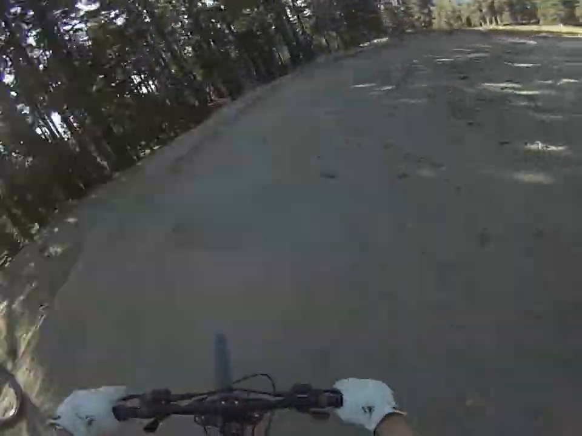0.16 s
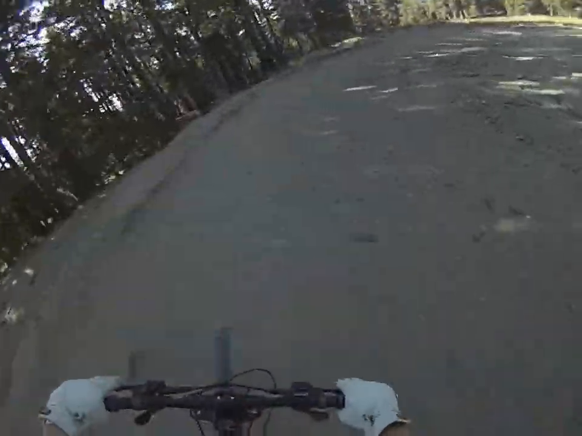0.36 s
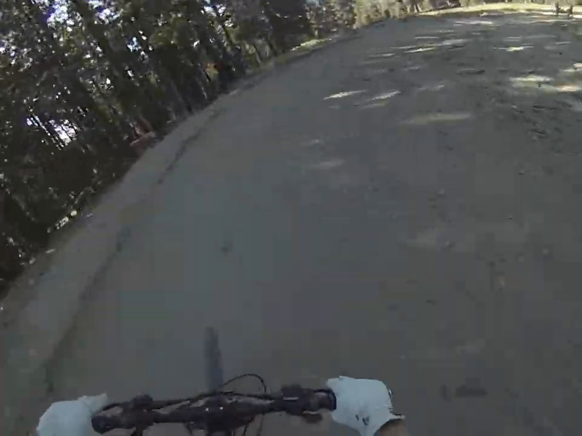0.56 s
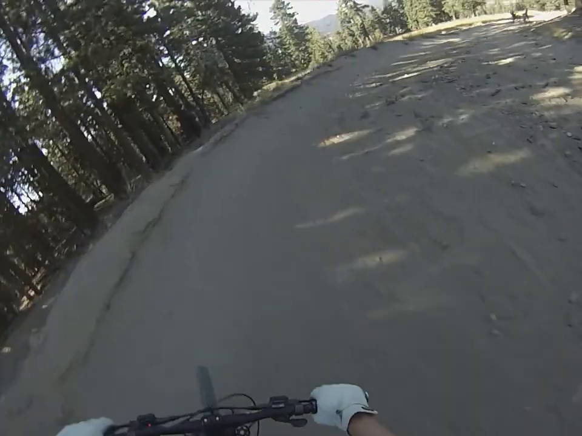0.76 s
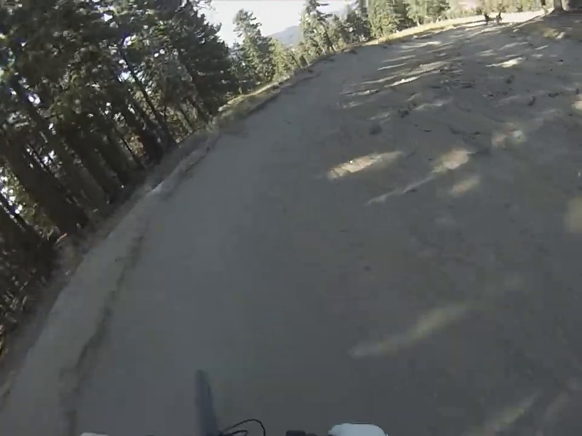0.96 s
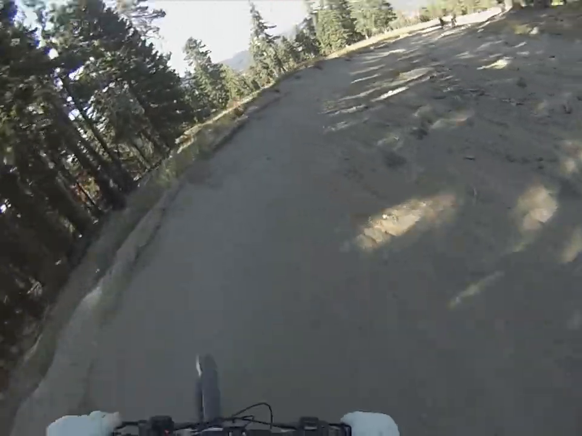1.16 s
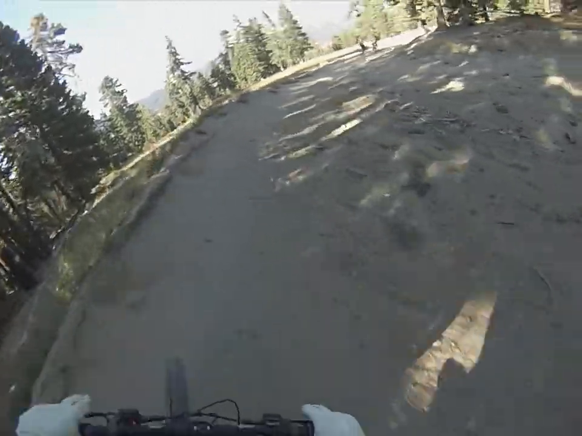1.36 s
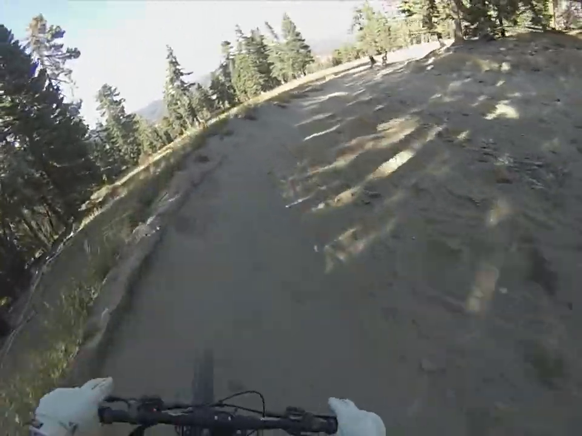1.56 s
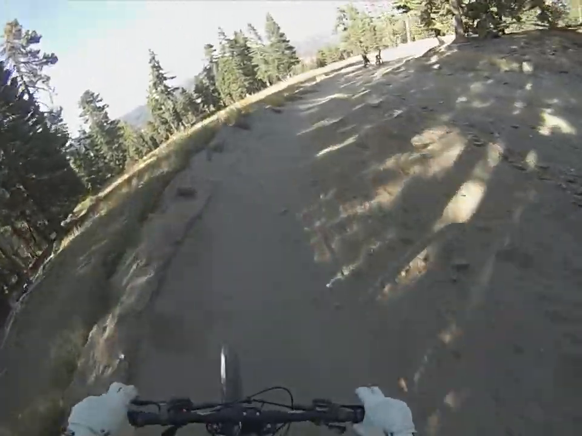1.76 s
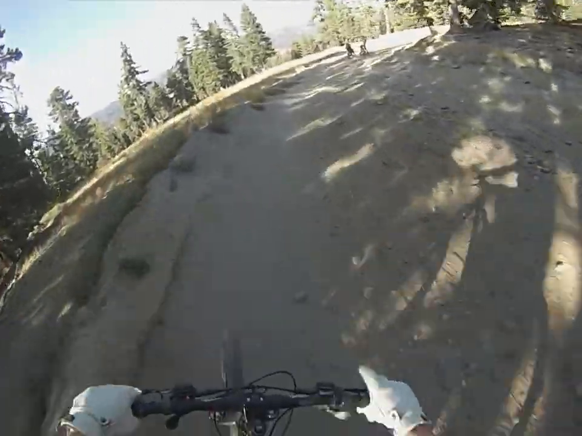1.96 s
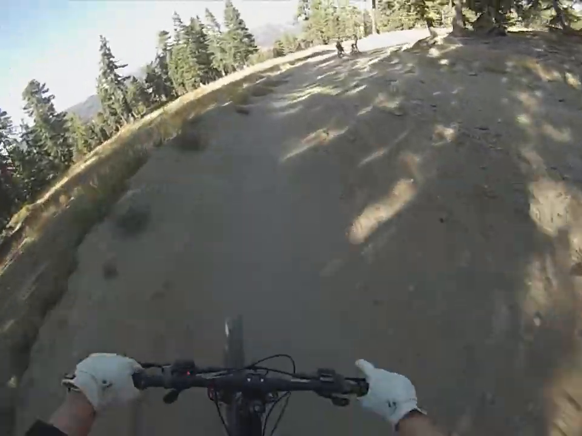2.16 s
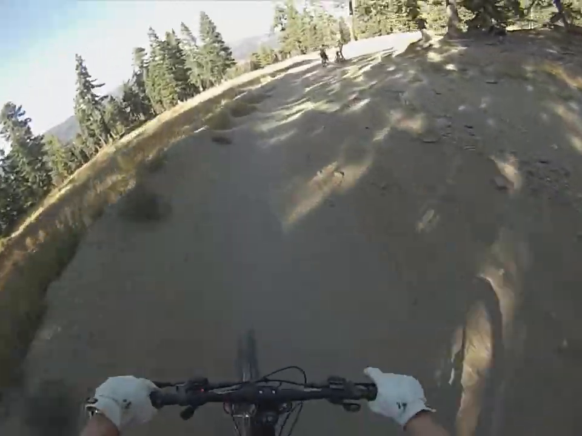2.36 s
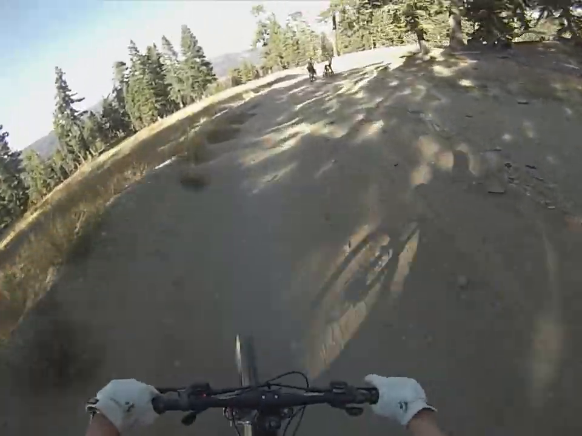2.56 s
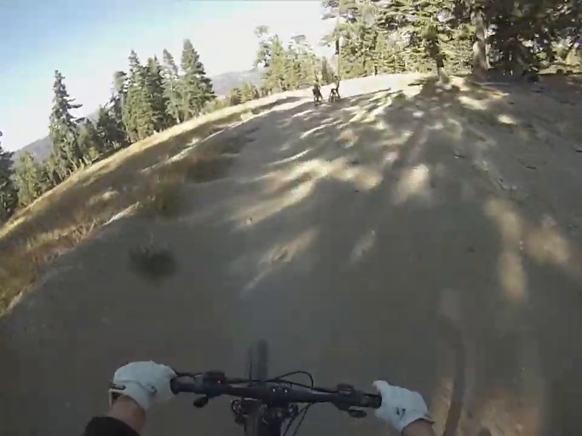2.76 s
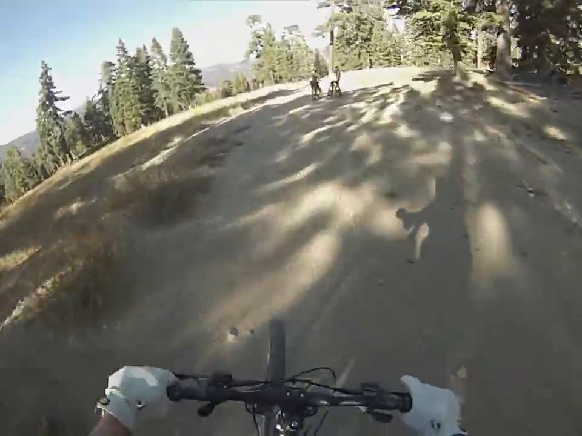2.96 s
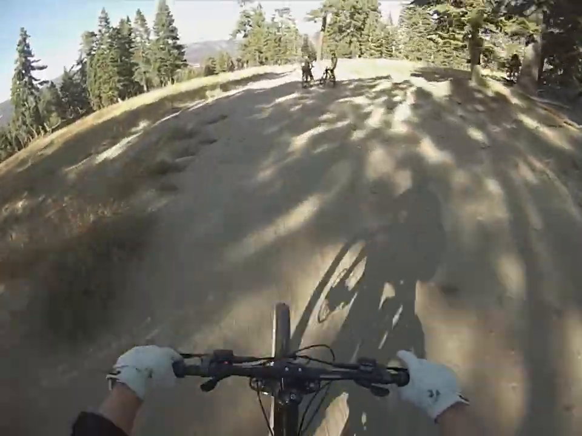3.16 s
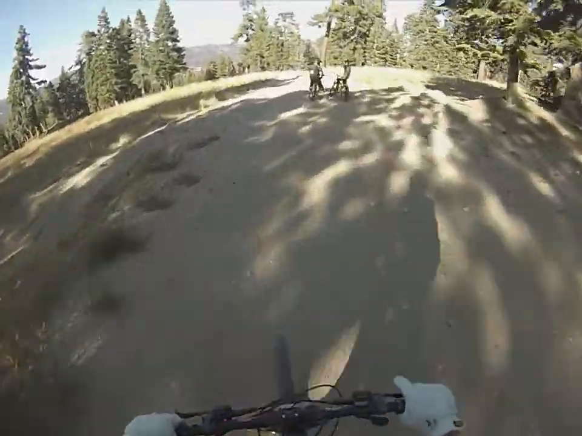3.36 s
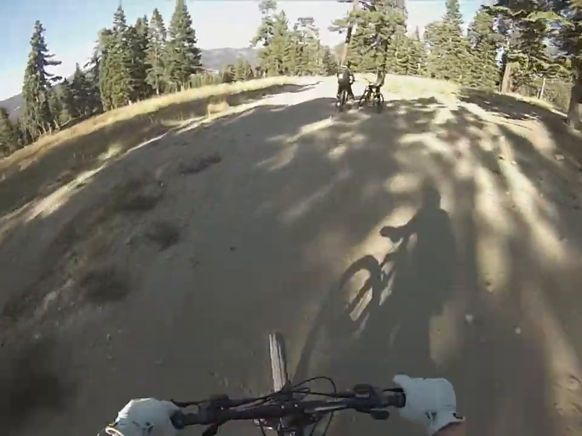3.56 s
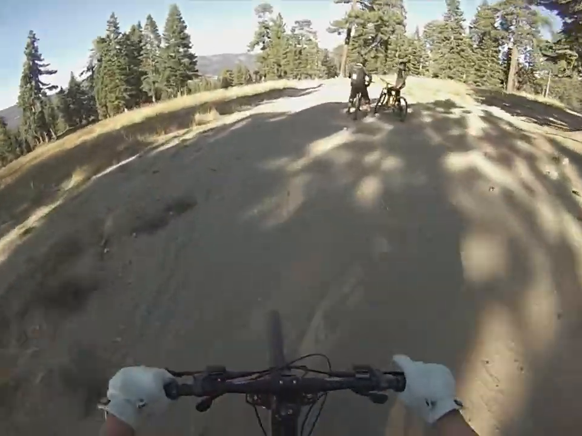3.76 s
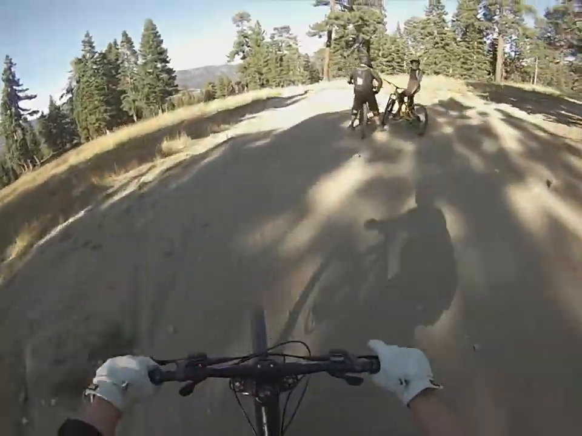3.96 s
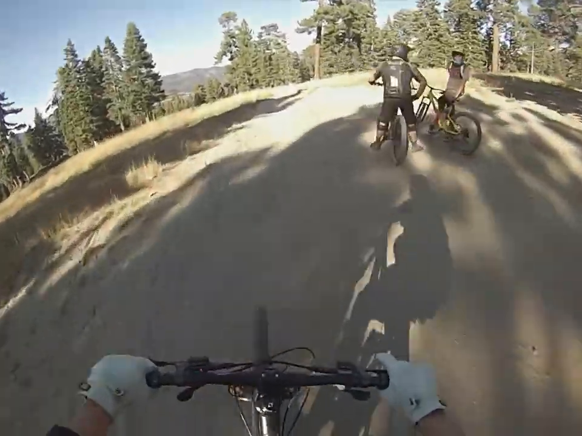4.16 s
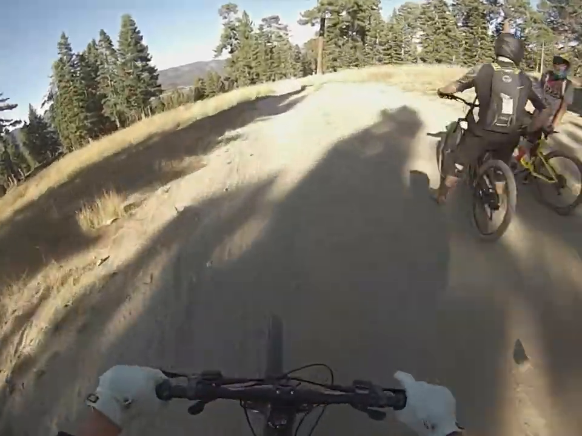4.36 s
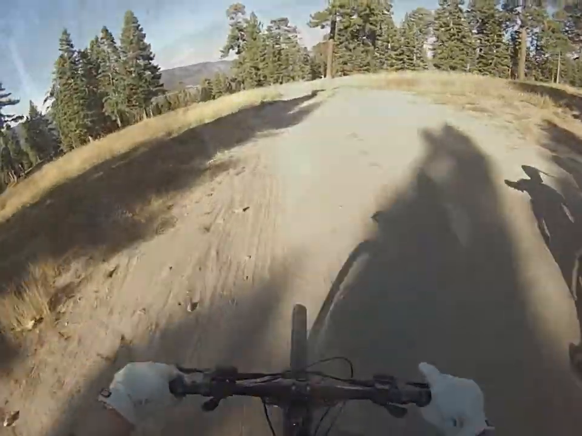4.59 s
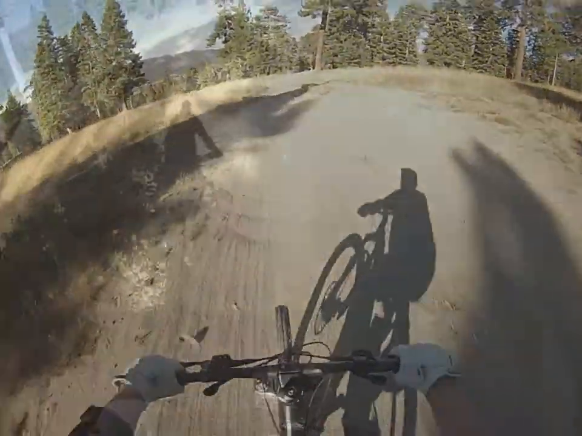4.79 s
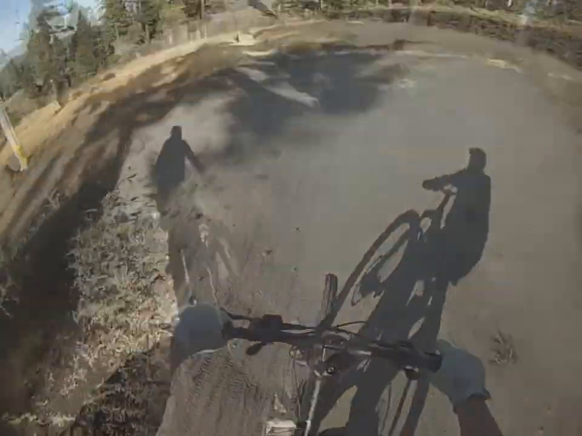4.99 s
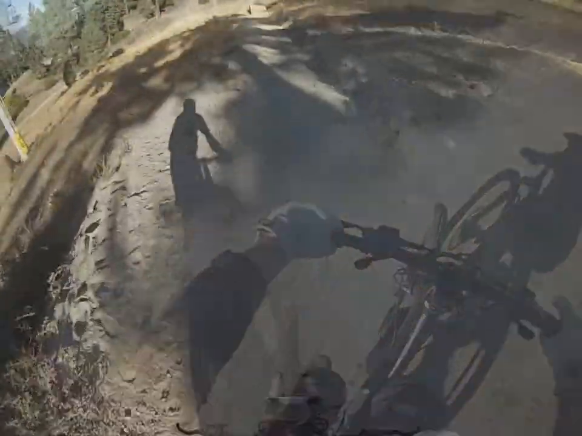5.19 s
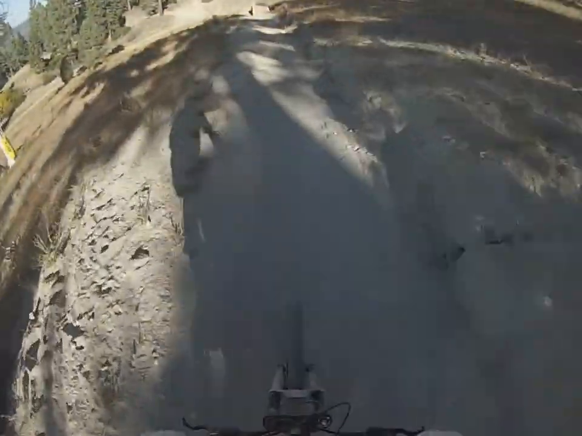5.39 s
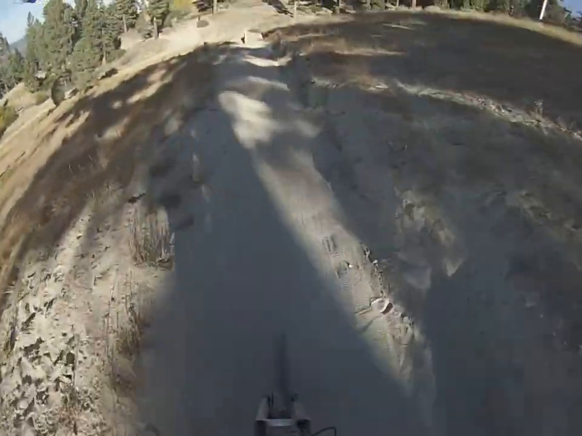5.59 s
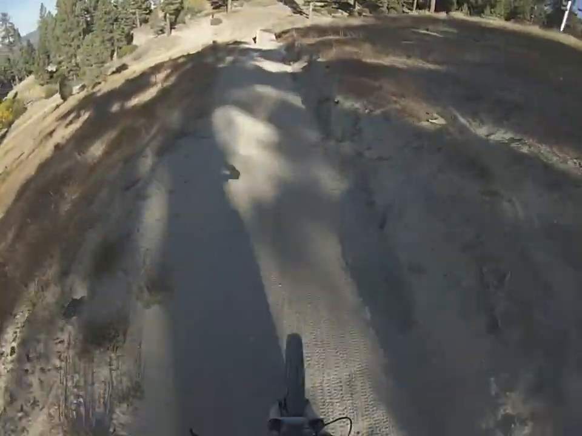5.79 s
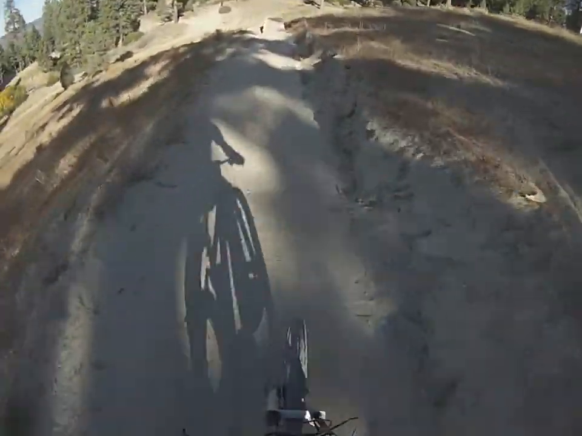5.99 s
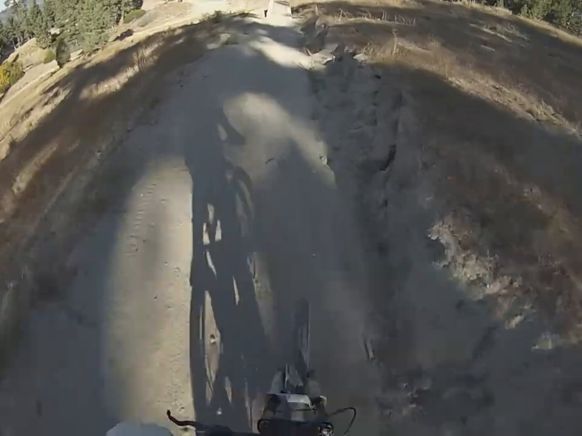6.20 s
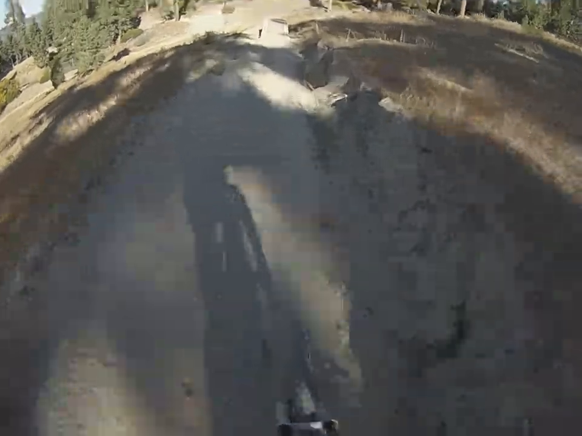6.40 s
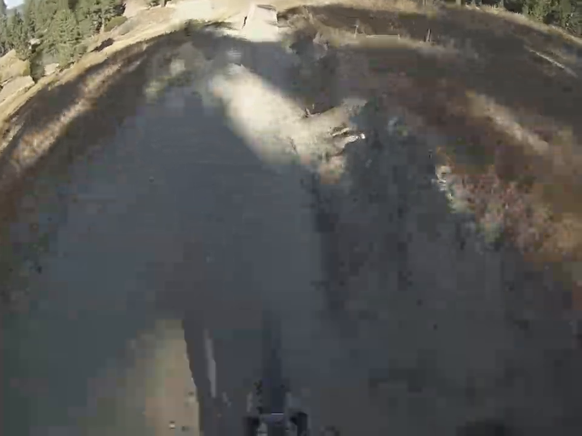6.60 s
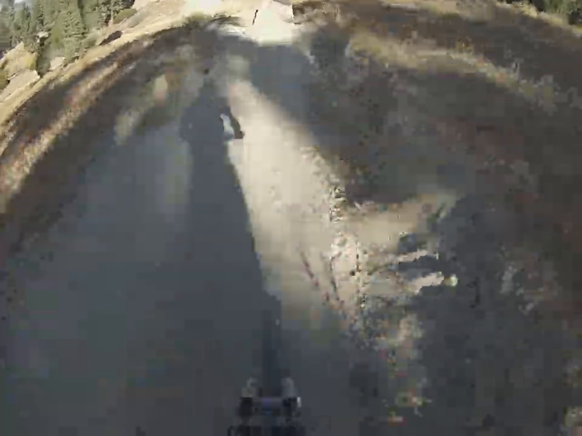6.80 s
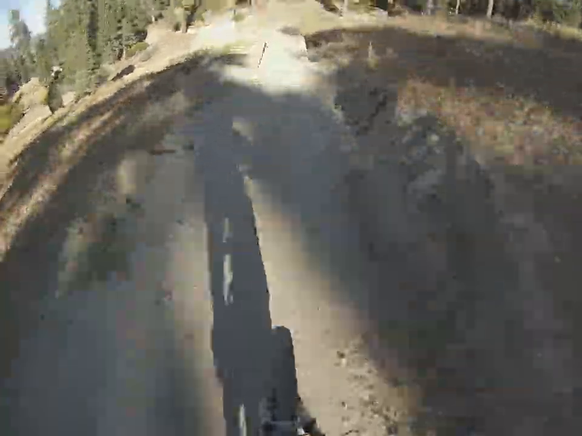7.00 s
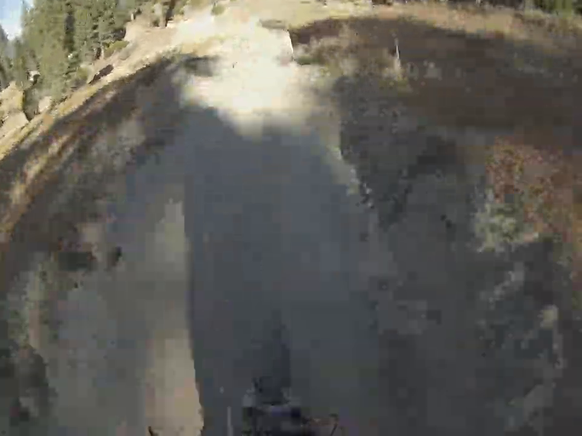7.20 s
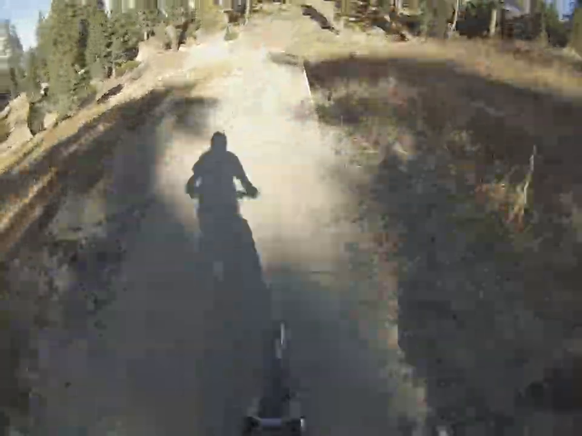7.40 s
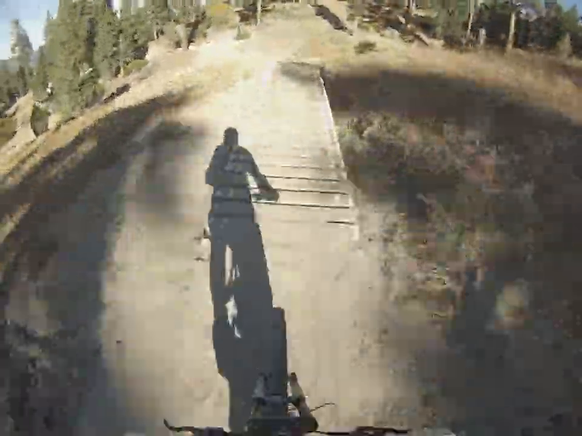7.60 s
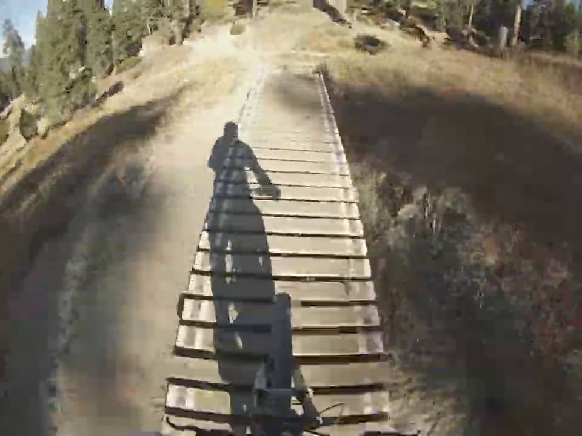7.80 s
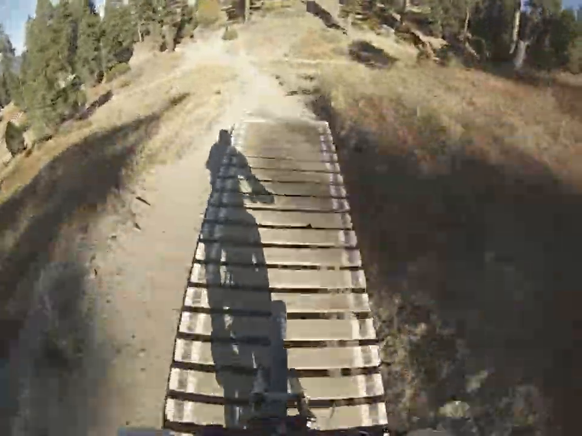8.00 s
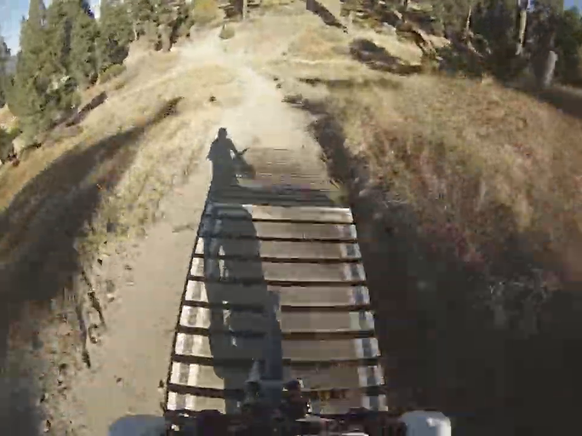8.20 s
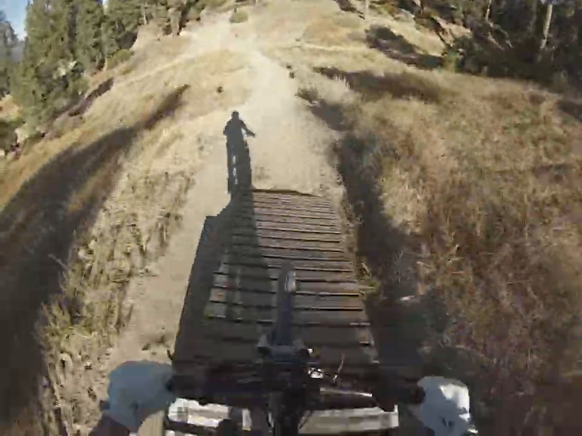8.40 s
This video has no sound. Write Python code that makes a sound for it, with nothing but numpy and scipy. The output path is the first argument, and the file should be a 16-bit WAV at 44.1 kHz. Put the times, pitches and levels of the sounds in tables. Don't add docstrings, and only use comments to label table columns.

```python
import sys
import numpy as np
from scipy import signal
from scipy.fft import rfft, irfft
from scipy.io import wavfile
from scipy.ndimage import uniform_filter1d

SR = 44100
rng = np.random.default_rng(int(sys.argv[2]) if len(sys.argv) > 2 else 0)


def put_to_file(sound):
    columns = np.atleast_2d(sound).T
    safe = np.clip(columns, -1, 1)
    whole_steps = np.round(safe * 32767)
    wavfile.write(sys.argv[1], SR, whole_steps.astype(np.int16))


def volts_from_decibels(level):
    exponent = np.asarray(level, float) / 20
    return 10 ** exponent


N = 372644

# t/s, level/dB, f/Hz
BUMPS = [(0.322, -7, 38.5), (0.414, 0, 40.3), (0.814, -5.5, 38.2), (1.247, -0.5, 37.5), (1.63, -4, 30.2),
         (1.659, 1, 39), (1.707, -5.5, 33.1), (1.808, -6, 33.6), (2.23, -5, 29.1), (2.99, -11, 36),
         (3.351, -11, 33), (3.693, -8.5, 38.2), (3.823, -8, 39.5), (4.145, -8.5, 29.2), (4.905, -2, 35),
         (5.668, 9, 44.6), (5.711, -12, 45.6), (6.618, -5, 36), (6.664, -4.5, 30.2), (6.777, -2, 42.3),
         (6.82, -4.5, 26.6), (6.866, -14, 40), (7.121, -5, 43.5), (7.175, -1, 39.6), (7.291, 1, 42),
         (7.711, -3, 33.5), (7.78, 0.5, 39.2), (7.805, -4.5, 44.4), (7.861, 3.5, 39.7), (7.89, -11, 42)]


def evened(x):
    return x / np.sqrt(np.mean(x ** 2) + 1e-20)


def peaked(x):
    return x / abs(x).max()


def read(points, hz):
    f, value = np.transpose(points)
    return np.interp(np.log(hz + 1), np.log(f + 1), value)


def add(mix, s, sound):
    part = mix[round(s * SR):][:len(sound)]
    part += sound[:len(part)]


def resonate(x, hz, width_hz):
    pole = np.exp((2j * np.pi * hz - np.pi * width_hz) / SR)
    return 2 * signal.lfilter([1 - abs(pole)], [1, -pole], x).real


def steep(x, hz, width_hz):
    return resonate(resonate(x, hz, width_hz), hz, 1.03 * width_hz)


def lowpass(x, order, hz):
    return signal.sosfilt(signal.butter(order, hz, fs=SR, output="sos"), x)


def walled(x):
    return lowpass(x, 3, 2750)


def noise(points, patchy_db, flicker_db, size):
    frames, hz = 4 * N // size + 5, np.fft.rfftfreq(size, 1 / SR)
    a, b, patches = rng.standard_normal((frames, len(hz), 3)).T
    patches = uniform_filter1d(patches, size=6, axis=0)
    patches = evened(uniform_filter1d(patches, size=8, axis=1))
    flicker = evened(uniform_filter1d(rng.standard_normal(frames), size=3))
    level_db = read(points, hz)[:, None] + patchy_db * patches + flicker_db * flicker
    z = (a + 1j * b) * volts_from_decibels(level_db)
    return evened(signal.istft(z, nperseg=size, noverlap=3 * size // 4)[1][:N])


def burst(t60_s, rise_s, chance):
    t = np.arange(len(chance)) / SR
    return chance * (1 - np.exp(-t / max(rise_s, 1e-4))) * volts_from_decibels(-60 * t / max(t60_s, .004))


def level(layer):
    # t/s, rolling load/dB, looseness of the ground/dB
    ride = [(0.0, -2.5, 4), (0.25, -1.5, -0.5), (0.64, -1, -4.5), (1.04, 2, -1.5), (1.31, -0.5, -6),
            (1.67, 3, 3), (2.2, 1.5, 0), (2.68, -0.5, -7.5), (2.96, -1.5, -2), (3.27, 0, -3.5),
            (4.55, 4, 2.5), (4.95, 1.5, 4), (5.43, -5, -9.5), (5.65, 3.5, 6.5), (6.77, 6.5, 8), (7.4, 5, 7),
            (8.0, 5, 4), (8.45, 9.5, 7)]
    # resting level/dB, share of load, of looseness, of stir, of ducking [dB/dB]
    follow = [
        (-28.5, 0.53, 0.36, 0.04, 0.7),
        (-39, 1.0, 0.0, 0.051, 0.99),
        (-51.5, 0.091, 0.89, 0.45, 1.12),
        (-63, 0, 0.75, 0.31, 0.83),
    ]
    stir_s, stir_from_db = 0.025, -6.5
    duck_at_s, duck_db, fall_s, hold_s, recover_s = 5.74, -21.5, .03, .45, 0.52

    time = np.arange(N) / SR
    t = time[::64]
    s, load_db, loose_db = np.transpose(ride)
    stir = 1
    for at, db, _ in BUMPS:
        stir = stir + volts_from_decibels(db - stir_from_db) * np.exp(-((t - at - stir_s / 2) / stir_s) ** 2)
    duck_t = duck_at_s + np.cumsum([0, fall_s, hold_s, recover_s])
    duck = np.interp(t, duck_t, [0, duck_db, duck_db, 0])
    drives = [np.ones(len(t)), np.interp(t, s, load_db), np.interp(t, s, loose_db), 20 * np.log10(stir), duck]
    return volts_from_decibels(np.interp(time, t, np.dot(follow[layer], drives)))


def jostle(per_s=200, spread_db=4.0):
    clump = volts_from_decibels(4.3 * evened(uniform_filter1d(rng.standard_normal(N), size=1200)))
    struck = rng.random(N) < per_s * clump / SR
    hits = volts_from_decibels(spread_db * np.minimum(rng.exponential(1, N), 3)) * struck
    return evened(signal.lfilter([1], [1, -np.exp(-1 / (0.004 * SR))], hits))


def hiss(strikes, grit_db=-13, air_db=-78):
    # f/Hz, level per Hz/dB
    wind_spectrum = [(1760, -45), (3000, -31), (3520, -1.5), (4260, 1), (7100, -10.5), (8400, -20),
                     (12200, -24.5), (13200, -50), (16000, -61)]
    air_spectrum = [(5000, -19.0), (8000, -6), (13500, -13.5), (14700, -9), (15200, -50)]
    wind = noise(wind_spectrum, patchy_db=3.5, flicker_db=1.5, size=256)
    air = noise(air_spectrum, patchy_db=4.0, flicker_db=1.0, size=256)
    gain = level(3)
    heard = np.minimum(gain / volts_from_decibels(-70), 1) ** 4
    air = heard * air + (1 - heard) * lowpass(air, 8, 12800)
    rough_wind = evened(wind * (1 + volts_from_decibels(grit_db) * strikes))
    return gain * rough_wind + np.minimum(volts_from_decibels(air_db), volts_from_decibels(-10) * gain) * air


def swells():
    # t/s, length/s, level/dB, f/Hz, width/Hz
    skids = [(0.36, 0.11, -46.5, 310, 260), (1.8, 0.098, -53, 2000, 1190), (1.602, 0.48, -42, 132, 110),
             (4.48, 0.31, -36.5, 117, 71), (4.898, 0.089, -32.5, 77, 50), (4.957, 0.153, -41.5, 1370, 350),
             (4.958, 0.12, -40.5, 690, 570), (5.621, 0.11, -55, 4340, 2440), (5.652, 0.139, -26, 180, 270),
             (5.693, 0.017, -52, 7200, 1500), (7.15, 0.147, -31.5, 150, 210),
             (7.2, 0.082, -67, 10100, 2500), (7.775, 0.059, -26.5, 310, 200), (7.8, 0.13, -29.5, 130, 140),
             (8.007, 0.23, -39.5, 260, 76), (5.743, 0.011, -34.5, 4560, 1060),
             (5.662, 0.0198, -27.5, 1980, 830), (5.655, .06, -35, 750, 460), (8.5, .022, -30, 2000, 900),
             (5.28, 0.057, -41, 215, 40), (2.55, 0.052, -33.5, 223, 30), (2.66, .05, -39.5, 223, 30),
             (7.12, 0.023, -31.5, 560, 250), (4.925, .03, -34.5, 390, 250), (0.395, .055, -45.5, 2200, 900)]
    # t/s, length/s, level/dB, f/Hz
    sprays = [(0, 0.37, -65.5, 4480), (0.301, .155, -65, 5000), (1.481, 0.097, -56.5, 5000),
              (1.599, 0.28, -62, 5500), (3.9, 0.43, -67, 4220), (4.499, .3, -64.5, 5000),
              (4.8, .28, -62.5, 5000), (5.691, .03, -48, 4500), (7.721, 0.12, -53, 4500)]
    spray_width_hz = 2500
    out = np.zeros(N)
    rows = list(skids) + [tuple(row) + (spray_width_hz,) for row in sprays]
    chances = rng.standard_normal((len(rows), 2, SR // 2))
    for (s, length_s, db, hz, width_hz), chance in zip(rows, chances):
        rough = chance[0] * volts_from_decibels(6.1 * evened(uniform_filter1d(chance[1], size=200)))
        sound = evened(steep(rough[:round(length_s * SR)], hz, width_hz))
        add(out, s, volts_from_decibels(db) * sound * signal.windows.tukey(len(sound), .6))
    return lowpass(out, 6, 11500)


def ticks():
    # t/s, peak/dB, brightness/dB, ring f/Hz
    grit = [(0.1238, -26, -12.5, 3610), (0.3354, -30.5, -22, 7050), (1.05, -16, -7, 5000),
            (1.6816, -31.5, -15, 3900), (1.7935, -26, -16, 6740), (2.0907, -29, -21, 5400),
            (2.249, -31.5, -17.5, 3630), (2.3202, -23, -12, 5300), (2.7166, -22, -7.5, 6270),
            (2.8121, -23, -10.5, 4960), (2.9299, -34.5, 8, 4790), (3.339, -25.5, -5.5, 4820),
            (3.5826, -27.5, -12.5, 3800), (4.3252, -31.5, -13.5, 4010), (4.5249, -25, -16, 6740),
            (4.6219, -29, -26, 4170), (4.7115, -29.5, -14, 3950), (4.9692, -31.5, -7.5, 4150),
            (5.5363, -30.5, -14, 7140), (5.7023, -24, -25, 4200), (6.2854, -38, -19, 4320),
            (6.8773, -34.5, -1, 3770), (7.108, -31.5, -9, 4060), (7.6237, -17, -6, 6300),
            (7.7198, -27, -8.5, 4900), (7.8192, -26.5, -14, 4410), (7.86, -27, -14, 4910),
            (8.215, -29, -10, 6070), (8.257, -30, -7, 4840), (8.349, -32.5, -13, 4000)]
    # t/s, peak/dB
    specks = [(0.02, -35.5), (0.058, -38), (0.395, -37), (0.485, -44), (4.83, -33.5), (1.506, -32.5),
              (1.641, -32), (2.3032, -39), (4.3305, -37), (3.3233, -41), (2.8, -35), (3.442, -32),
              (3.634, -32), (3.7342, -38), (4.218, -34), (4.5498, -33), (4.7436, -32), (4.998, -30.5),
              (5.241, -38), (5.3393, -37.5), (5.482, -34.5), (5.6187, -37), (6.2, -47), (7.032, -30),
              (7.1678, -31), (7.3714, -33), (8.01, -38), (8.096, -32)]
    # t/s, peak/dB, ring f/Hz
    grains = [(0.0324, -46, 3850), (0.2463, -46, 3990), (0.2794, -46, 3790), (0.4388, -44, 4190),
              (1.297, -42, 4240), (1.4385, -48, 4340), (1.5579, -45, 4970), (1.7315, -43, 4260),
              (1.8137, -35, 3750), (2.14, -43, 3900), (2.158, -39, 3670), (2.2277, -43, 3980),
              (2.4153, -41, 4390), (2.4932, -51, 4220), (2.8763, -45, 4350), (2.9544, -53, 3820),
              (3.022, -49, 3870), (3.1234, -55, 6280), (3.1476, -45, 3920), (3.3677, -44, 3780),
              (3.3981, -45, 3990), (3.4964, -46, 3880), (3.5348, -45, 3890), (3.6929, -49, 4790),
              (3.888, -45, 3920), (4.3484, -44, 4890), (4.4397, -44, 4370), (4.6068, -42, 4100),
              (4.8697, -40, 4510), (4.9371, -43, 4160), (5.1414, -53, 4070), (5.4326, -51, 4320),
              (5.6689, -36, 4370), (5.7156, -32, 4100), (6.4792, -53, 4020), (6.5435, -50, 4190),
              (6.7421, -43, 4110), (6.778, -42, 3600), (6.7945, -40, 3860), (6.977, -43, 4120),
              (7.0574, -43, 3730), (7.1174, -40, 3860), (7.154, -40, 3670), (7.195, -36, 4000),
              (7.2528, -38, 3850), (7.2917, -43, 4150), (7.3482, -43, 4070), (7.406, -43, 3840),
              (7.5074, -44, 3800), (7.6834, -39, 4670), (7.7937, -37, 4010), (7.8978, -47, 3740),
              (8.1248, -47, 4750), (8.1578, -43, 4130)]
    # f/Hz, level per Hz/dB
    shell = [(880, -29), (1500, 7.5), (2500, 10.5), (4280, -4.5), (4830, -5), (6390, -4.5), (8890, -19),
             (13000, -23.5), (15200, -32), (16400, -41)]
    speck_bright_db, speck_hz, grain_bright_db = -16.5, 4200, -13
    out, hz = np.zeros(N), np.fft.rfftfreq(1024, 1 / SR)
    rows = list(grit) + [(s, db, speck_bright_db, speck_hz) for s, db in specks]
    rows += [(s, db, grain_bright_db, ring_hz) for s, db, ring_hz in grains]
    octaves = np.clip(np.log2(hz / 6000 + 1e-3), -1, 1.2)
    chances = rng.standard_normal((len(rows), 1024))
    for (s, db, bright_db, ring_hz), chance in zip(rows, chances):
        colour = volts_from_decibels(read(shell, hz) + (bright_db + 19.0) * octaves)
        snap = burst(0.0071, 0.00053, irfft(rfft(chance) * colour))
        spot = peaked(steep(snap, ring_hz, 640))
        add(out, s - .0006, volts_from_decibels(db) * peaked(peaked(snap) + volts_from_decibels(-12.5) * spot))
    return out


def case(x):
    # f/Hz, width/Hz, level/dB
    modes = [(1558, 447, -3.5), (2000, 422, 0), (2250, 518, 0), (2716, 524, -5)]
    out = 0
    for k, (hz, width_hz, db) in enumerate(modes):
        mode = resonate(resonate(x, hz, width_hz), hz, 2.95 * width_hz)
        out = out + (-1) ** k * volts_from_decibels(db) * mode
    return walled(out)


def rattle(strikes, smooth_db=2.0):
    return level(2) * evened(case((strikes + volts_from_decibels(smooth_db)) * rng.standard_normal(N)))


def clacks():
    # t/s, peak/dB
    knocks = [(0.1215, -31), (0.2516, -32.5), (0.4204, -26), (0.3667, -36), (0.8126, -35), (4.4775, -31),
              (1.6127, -28), (1.6803, -28.5), (1.815, -28), (1.983, -29.5), (2.174, -27), (2.812, -34),
              (2.9855, -34), (3.252, -32), (3.703, -29.5), (3.8132, -34), (4.2514, -30), (4.5251, -30),
              (4.5471, -26.5), (4.9577, -31), (4.9988, -24), (5.034, -28), (5.1112, -30.5), (5.227, -35),
              (5.837, -29.5), (6.7802, -23), (6.8384, -30), (7.1846, -23.5), (7.2417, -26.5), (8.0963, -28)]
    # start t/s, length/s, gap/s, first level/dB, last level/dB
    chatter = [(.4362, .01, .015, -26.5, -27), (.824, .03, .018, -37, -37), (1.2695, .07, .0158, -33, -33),
               (2.195, .02, .013, -36, -36), (2.997, .03, .025, -34, -39), (3.694, .005, .01, -32, -32),
               (3.735, .03, .012, -37, -36), (3.829, .005, .01, -33, -33), (3.927, .04, .03, -36, -36),
               (4.91, .04, .028, -32, -32), (5.89, .1, .031, -51, -49), (6.03, .03, .022, -46, -50),
               (6.187, .03, .02, -46, -43), (6.264, .1, .028, -43, -43), (6.456, .11, .04, -40, -37),
               (7.3026, .035, .0147, -29, -26), (7.719, .06, .055, -30, -24)]
    # t/s, peak/dB, f/Hz
    raps = [(0.0567, -32, 2390), (0.3346, -32, 2160), (0.755, -36, 2090), (1.0525, -34, 2400),
            (1.2496, -24.5, 1940), (2.156, -29, 2150), (4.623, -29, 2040), (0.583, -27.5, 1680),
            (0.586, -31, 2330), (1.485, -32, 1560), (5.7016, -27, 2120), (5.7166, -4.5, 2140),
            (5.745, -8.5, 2000), (6.138, -44, 2600), (7.2895, -22, 1690), (7.7805, -19, 2350),
            (7.8065, -12.5, 1360), (7.86, -26, 2200), (7.866, -21.5, 1300), (7.797, -28, 2520)]
    # t/s, peak/dB, f/Hz
    taps = [(0.0961, -37, 1510), (0.139, -34, 1620), (0.392, -34, 1700), (1.4649, -42, 1710),
            (1.6024, -31, 1610), (1.6314, -32, 1580), (1.7104, -40, 1600), (1.7738, -32, 1660),
            (1.821, -27, 1610), (2.1272, -36, 1740), (2.2296, -37, 2350), (2.2997, -33, 1540),
            (2.5496, -39, 1570), (2.6283, -38.5, 1640), (2.8254, -39, 2280), (2.8424, -39, 1350),
            (3.1481, -40, 1740), (3.3771, -34, 1660), (3.5682, -36, 1430), (3.7474, -35, 1620),
            (3.7554, -41, 1580), (4.155, -35, 1630), (4.2162, -32, 1730), (4.3584, -36, 1740),
            (4.367, -35, 1770), (4.4976, -34, 1690), (4.5779, -32, 2310), (4.6103, -30, 1930),
            (4.6911, -34, 1660), (4.7021, -31, 1750), (4.74, -29, 2470), (4.813, -30, 1670),
            (4.8702, -28.5, 2280), (4.977, -27, 1350), (5.0454, -30, 1500), (5.0544, -36, 1590),
            (5.0754, -35, 1350), (5.1551, -37, 1770), (5.164, -35, 1610), (5.1894, -42, 2020),
            (5.2184, -41, 1690), (5.241, -36, 1640), (5.3862, -42, 1380), (5.6395, -28.5, 1660),
            (5.8564, -52, 1880), (6.4935, -36, 1660), (6.5074, -40, 1490), (6.5256, -40, 1680),
            (6.556, -38, 1640), (6.5744, -41, 1520), (6.6148, -34, 1720), (6.6265, -31, 1510),
            (6.723, -30, 1470), (6.9929, -32, 1690), (7.0378, -31, 1750), (7.1967, -29, 1380),
            (7.2249, -29, 1710), (8.068, -32, 1680), (8.1578, -35, 1420), (8.3795, -31, 1690)]
    latch_hz, latch_spread, bounce_spread_db, bounce_jitter = 1640, 0.051, 2.5, 0.19
    latch = list(knocks)
    for start_s, length_s, gap_s, first_db, last_db in chatter:
        after_s = np.arange(0, length_s, gap_s)
        late, size = rng.standard_normal((len(after_s), 2)).T * (after_s > 0)
        s = start_s + after_s + bounce_jitter * gap_s * late
        db = first_db + (last_db - first_db) * after_s / length_s + bounce_spread_db * size
        latch += zip(s, db)
    pitched = [(s, db, latch_hz * (1 + latch_spread * rng.standard_normal())) for s, db in latch]
    return pitched + list(raps) + list(taps)


def blows():
    # t/s, peak/dB, f/Hz, t60/s, crack/dB
    thuds = [(0.416, -24.5, 219, 0.06, -18), (1.766, -30.5, 249, 0.054, -16),
             (3.73, -31.5, 242, 0.074, -15), (6.79, -25.5, 300, .05, -20), (0.43, -27, 330, .05, -22),
             (4.575, -23.5, 221, 0.049, -14), (4.934, -26.5, 388, 0.087, -13),
             (5.664, -16.5, 304, 0.045, -10), (5.688, -20, 369, 0.056, -2), (5.717, -8, 266, 0.039, -0.5),
             (5.746, -15.5, 218, 0.05, 13), (5.836, -28.5, 300, 0.061, -30), (6.807, -24, 344, 0.034, -23),
             (7.123, -16, 304, 0.08, -5.5), (7.293, -16, 226, 0.067, -35), (7.781, -15, 221, 0.027, -26),
             (7.796, -16, 277, 0.027, -25), (7.808, -7, 316, 0.034, -17), (7.865, -8.5, 295, 0.055, -1.5),
             (8.143, -22, 235, 0.069, -25), (8.311, -25.5, 240, 0.06, -17)]
    out = np.zeros(N)
    for (s, db, hz, t60_s, crack_db), chance in zip(thuds, rng.standard_normal((len(thuds), 5000))):
        body = steep(burst(t60_s, 0.00065, chance), hz, 0.73 * hz)
        crack = steep(burst(0.013, 0.0013, chance), 740, 620)
        add(out, s, volts_from_decibels(db) * (peaked(body) + volts_from_decibels(crack_db) * peaked(crack)))
    rows = clacks()
    for (s, db, hz), chance in zip(rows, rng.standard_normal((len(rows), 1500))):
        puff = burst(0.015, 0.00017, chance)
        spot = peaked(steep(puff, hz, 0.2 * hz))
        add(out, s, volts_from_decibels(db) * peaked(spot + volts_from_decibels(0.9) * peaked(case(puff))))
    return walled(out) + volts_from_decibels(-33) * lowpass(out, 2, 6000)


def ring():
    # f/Hz, level/dB, t60/s
    modes = [(1868, -44.5, .3), (2772, -47.5, .13), (575, -36, .08), (222, -38, .3)]
    out, t = np.zeros(N), np.arange(SR // 12) / SR
    song = sum(volts_from_decibels(db - 60 * t / t60_s) * np.sin(2 * np.pi * hz * t) for hz, db, t60_s in modes)
    add(out, 5.755, song * signal.windows.tukey(len(t), .2))
    return out


def tyres():
    # f/Hz, level per Hz/dB
    roar_spectrum = [(35, -7.5), (60, 5), (92, -9), (162, -9), (229, -10), (453, -12), (578, -18),
                     (907, -18.5), (1110, -26.5), (1300, -20.5), (1690, -21), (2860, -120)]
    # f/Hz, width/Hz, level/dB
    air_modes = [(226, 28.7, -1.5), (322.2, 23, -7.5), (562, 84, -11.5)]
    dirt = noise([(20, 0.012), (20000, 0.0039)], patchy_db=-1.5, flicker_db=3.5, size=1024)
    hum = 0
    for hz, width_hz, db in air_modes:
        hum = hum + volts_from_decibels(db) * evened(resonate(resonate(dirt, hz, width_hz), hz, 3 * width_hz))
    roar = noise(roar_spectrum, patchy_db=2.5, flicker_db=0.0, size=1024)
    return level(1) * evened(roar + hum)


def mount():
    # t/s, level/dB
    nudges = [(0.028, -12.5), (0.484, -12.5), (1.601, -9), (1.853, -10.5), (1.961, -10), (2.164, -9.5),
              (4.246, -11), (4.467, -12.5), (4.595, -13), (5.061, -13.5), (5.202, -13.5), (5.78, -17.5),
              (5.85, -23.5), (6.345, -15.5), (0.24, -12), (2.35, -14.5), (3.19, -15), (3.99, -13.5),
              (1.0, -20), (4.86, -11), (3.53, -18), (6.544, -14.5), (7.043, -8), (7.068, -15), (7.343, -13),
              (7.388, -10.5), (7.438, -11.5), (7.528, -15), (8.175, -11.5)]
    mount_hz, rise_s, fall_s, jolt_db = 35.7, .012, .022, 2.2
    t, out = np.arange(SR // 4) / SR, np.zeros(N)
    envelope = (1 - np.exp(-t / rise_s)) ** 2 * np.exp(-t / fall_s)
    for s, db, hz in list(BUMPS) + [(s, db, mount_hz) for s, db in nudges]:
        add(out, s, -volts_from_decibels(db + jolt_db) * np.sin(2 * np.pi * hz * t) * envelope)
    chance = rng.standard_normal(N)
    shake = evened(steep(chance, 28.9, 20.2))
    shake = shake + volts_from_decibels(-13.5) * evened(steep(chance, 88, 62))
    shake = shake + volts_from_decibels(-3.0) * evened(steep(chance, 20.4, 6.0))
    return out + volts_from_decibels(-6.5) * level(0) * shake


def scene():
    strikes = jostle()
    background = hiss(strikes) + swells() + ticks()
    bike = rattle(strikes) + blows() + ring() + tyres() + mount()
    return (background + bike)[None]


def top_cut(x):
    return signal.sosfilt(signal.butter(12, 16500, fs=SR, output="sos"), x)


def record(dry):
    held = dry / (1 + (abs(dry) / .95) ** 6) ** (1 / 6)
    band = signal.firwin(511, 16400, window=("kaiser", 8), fs=SR)
    edged = signal.oaconvolve(held, band[None], "same")
    return top_cut(edged)


dry = scene()
out = record(dry)
put_to_file(out)
```